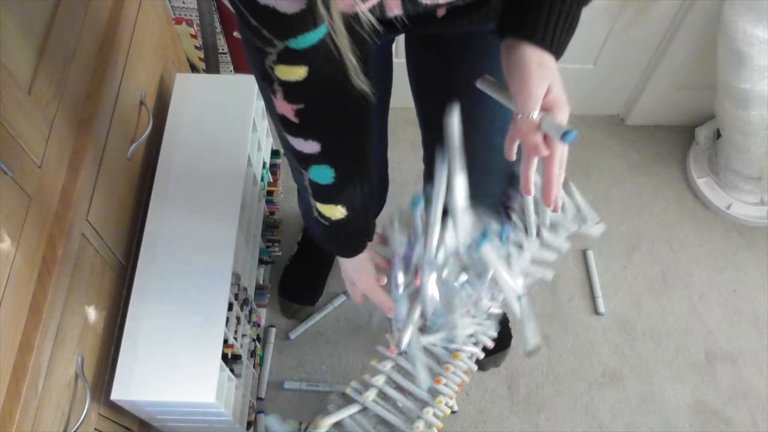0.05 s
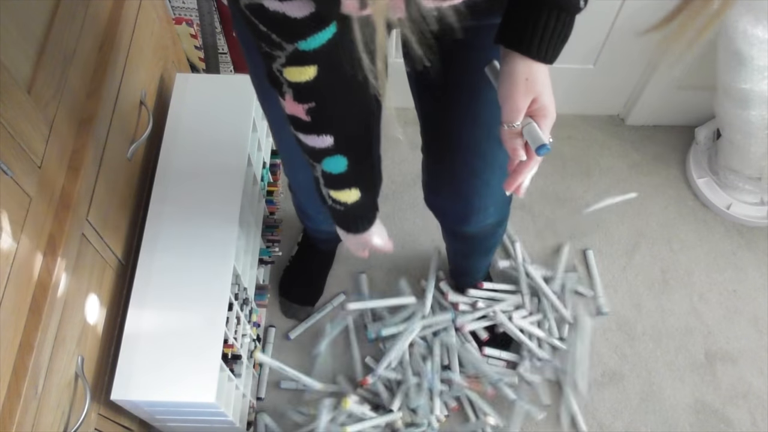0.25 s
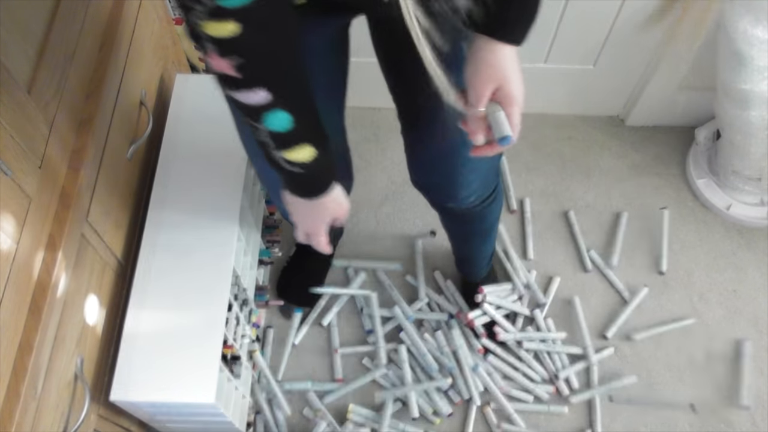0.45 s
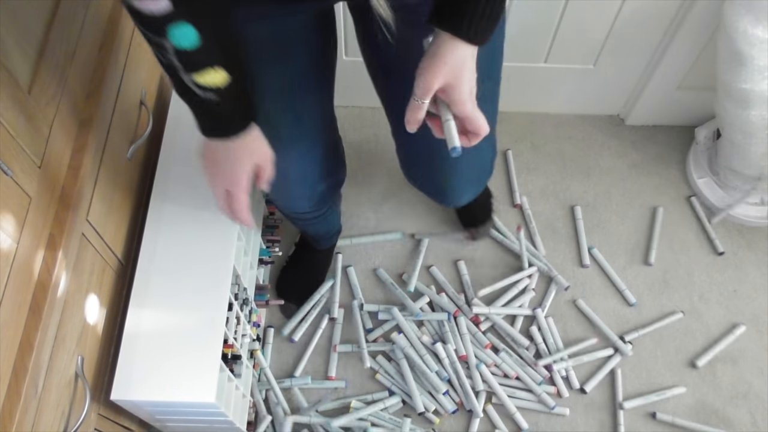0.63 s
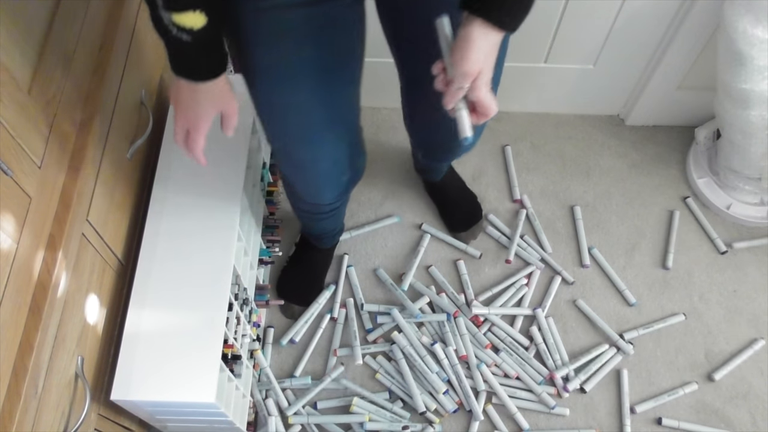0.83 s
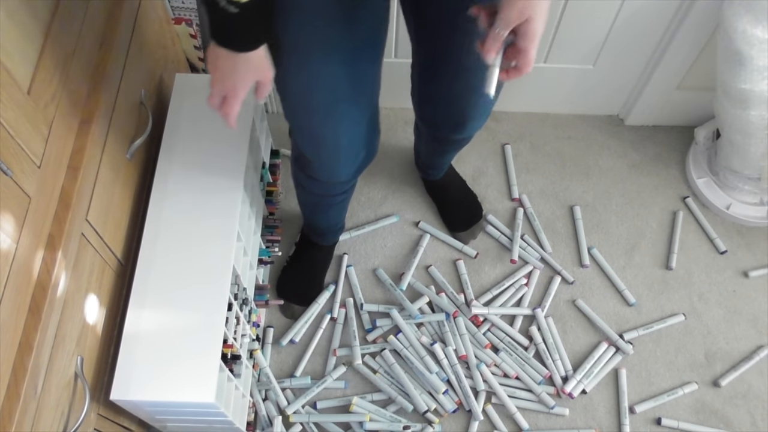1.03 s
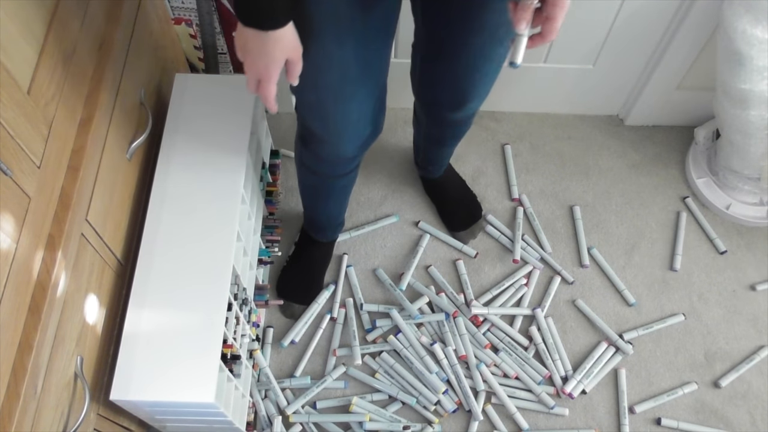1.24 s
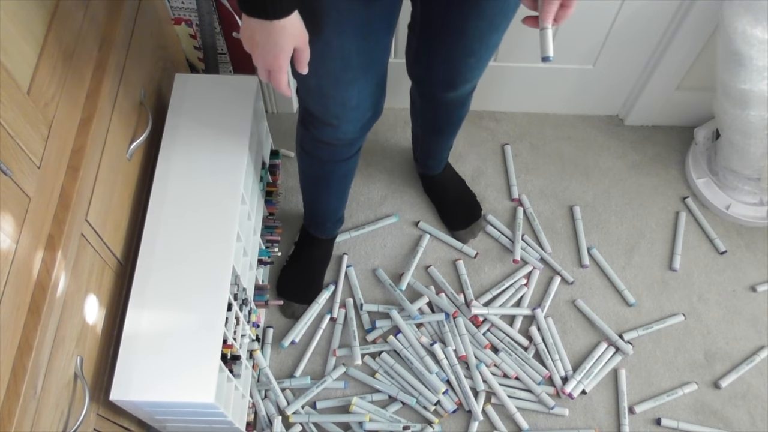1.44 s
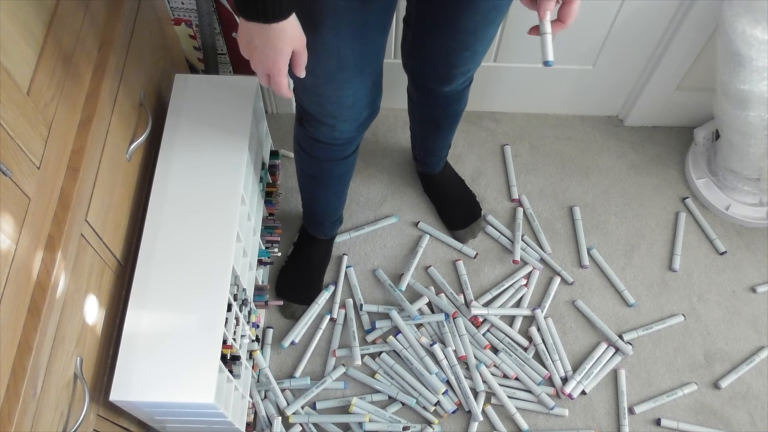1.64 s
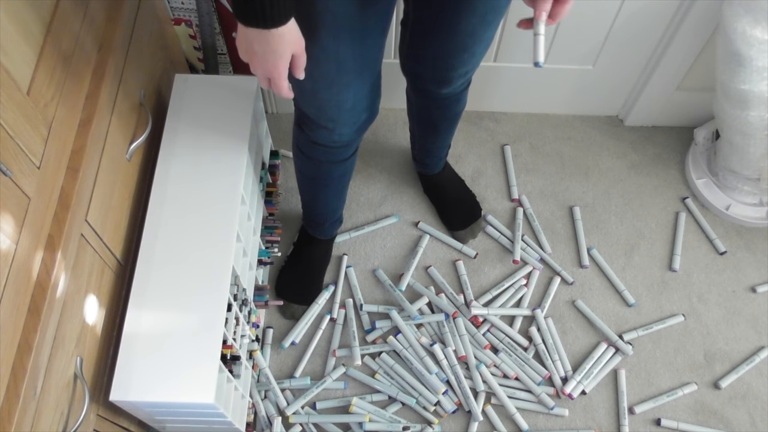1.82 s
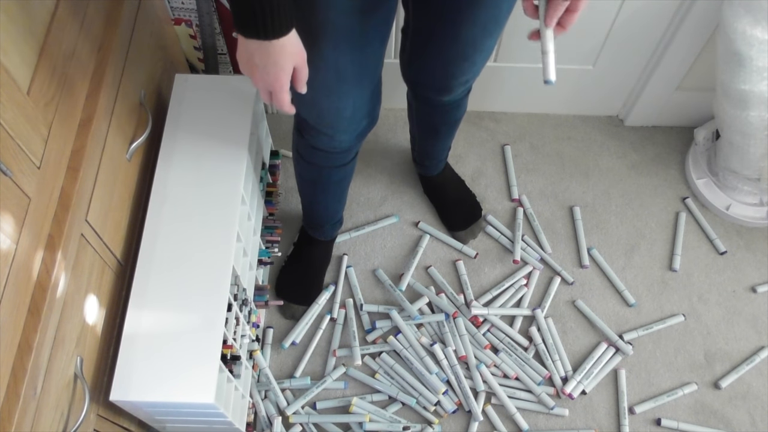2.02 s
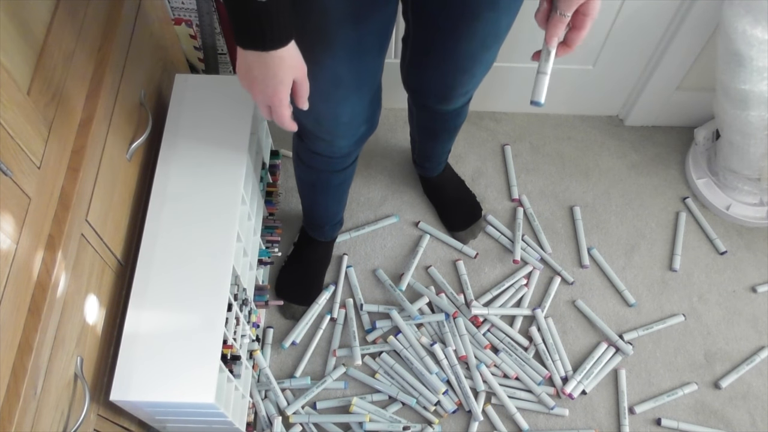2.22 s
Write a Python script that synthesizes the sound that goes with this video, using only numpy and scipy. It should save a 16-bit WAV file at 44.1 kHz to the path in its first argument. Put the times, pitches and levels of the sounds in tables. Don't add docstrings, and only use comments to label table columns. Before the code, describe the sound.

A big stack of plastic marker pens collapses onto carpet, a loud rattling clatter thinning to clicks

```python
import sys
import numpy as np
from scipy import signal
from scipy.fft import rfft, irfft
from scipy.io import wavfile

SR = 44100
rng = np.random.default_rng(int(sys.argv[2]) if len(sys.argv) > 2 else 0)


def pcm_store(signal):
    levels = np.round(np.clip(np.atleast_2d(signal), -1, 1) * 32767)
    wavfile.write(sys.argv[1], SR, levels.astype(np.int16).T)


def convert_level_to_amplitude(level_db):
    exponent = np.asarray(level_db, float) / 20
    return 10 ** exponent


N = 100107

# frequency_hz, density_db
HUSH_TONE = [(30, -8.5), (200, -4), (800, -11), (2100, -24), (3000, -29.5), (5200, -31), (8500, -22.5),
             (16000, -26)]
HUSH_DB = -56.5
# frequency_hz, correlation [-1 to 1]
HUSH_SAME = [(60, -0.073), (290, -0.56), (640, 0.068), (1400, 0.56), (2400, 1), (7400, 0.98), (9000, 0.6),
             (15000, -0.3)]
# frequency_hz, difference_db
HUSH_LEAN = [(60, -1.6), (950, 0.19), (15000, 0)]

# start_s, level_db, thump_relative_db, collisions_per_ms
FALL = [
    [(0.085, -25.5, -5, 2.6), (0.093, -23.5, -3.5, 1.3), (0.125, -10.5, -14, 1.27), (0.143, -22, -5, 1.25),
     (0.161, -12.5, -5.5, 1.2), (0.255, -15.5, -6.5, 1.62), (0.329, -20.5, -0.5, 1.23),
     (0.36, -21.5, -5.5, 1.134)],
    [(0.39, -23, 0, 1.3), (0.526, -20.5, -2, 1.33), (0.57, -17.5, -3.5, 1.3), (0.822, -34.5, 6, 1.32),
     (0.834, -19.5, -16, 0.85), (0.856, -39, 11.5, 1.4), (0.9, -34.5, 2, 1.3), (0.95, -47.5, 13, 1.12)],
]
# start_s, level_db, thump_relative_db, collisions_per_ms
SETTLE = [
    (1.0, -45, 7.5, 0.71),
    (1.1, -55, 19.5, 0.6),
    (1.19, -61.5, 19, 0.6),
    (1.25, -57, 15, 0.3),
    (1.35, -66, 13.5, .5),
    (1.449, -72.5, 14.5, 0.47),
]
# start_s, tick_peak_db, thump_relative_db, tick_pitch_hz, thump_pitch_hz
HITS = [(0.0916, -12, 0, 7670, 464), (0.121, -13, -4, 7450, 478), (0.1593, -3.5, -1.5, 7810, 493),
        (0.1978, 0.5, -9, 8070, 339), (0.2113, -13, -4.5, 8100, 253), (0.2477, -12, -4.5, 7510, 505),
        (0.3344, -10.5, -18.5, 7603, 433.7), (0.3553, -4.5, -14, 7190, 344), (0.3755, -12.5, 1, 7810, 464),
        (0.4453, -10, -10.5, 7900, 506), (0.5344, -17, -8.5, 8620, 530), (0.5513, -20, -2, 7950, 335),
        (0.592, -8.5, -7.5, 2248, 445), (0.7163, -5, 2, 3300, 1240), (0.7265, -13.5, 6.5, 2218, 1045),
        (0.7494, -10.5, -31.5, 6815, 487), (0.7869, -22, -19, 2120, 294), (0.7953, -19, -12, 7150, 258),
        (0.8017, -15, -20, 6940, 336), (0.8301, -14.5, -9.5, 7360, 261), (0.8405, -16.5, 12.5, 3833, 1150),
        (0.8695, -21.5, -10, 8100, 479), (0.8946, -9.5, -19, 6810, 430), (0.9341, -21.5, 0.5, 8320, 460)]
# start_s, tick_peak_db, thump_relative_db, tick_pitch_hz, thump_pitch_hz
LAST_HITS = [(0.9983, -18.5, 0.5, 12600, 470), (1.0021, -21, 1.5, 7500, 478.7),
             (1.052, -26.5, -13.5, 2600, 358), (1.0584, -30, 0.5, 1755, 350),
             (1.073, -34.5, 7.5, 1650, 353), (1.0814, -29.5, -33, 2290, 452),
             (1.097, -20.5, -36.5, 6900, 344), (1.1248, -29, -4.5, 8580, 326), (1.1372, -23, -2, 2977, 497),
             (1.1532, -29.5, -11, 2680, 489), (1.2055, -36.5, -16.5, 6800, 378),
             (1.2146, -22.5, -16, 8410, 336), (1.2165, -25.5, -3.5, 2027, 600),
             (1.2175, -29, -17, 3300, 397), (1.2241, -36, 2.5, 7900, 328), (1.2394, -35.5, -22, 3440, 363),
             (1.291, -45, 2, 5000, 895), (1.293, -12.5, -17, 4100, 512), (1.8155, -42.5, -10.5, 7670, 507)]
# start_s, peak_db, pitch_hz
TICKS = [(0.1096, -5.5, 6974), (0.126, -8.5, 7110), (0.1309, -5, 8050), (0.1456, -9.5, 7190),
         (0.1526, -7, 7750), (0.1723, -3.5, 6930), (0.1791, -2.5, 7110), (0.2018, -2.5, 7760),
         (0.2117, -3.5, 8816), (0.2212, 0.5, 7530), (0.2293, -7, 7890), (0.2505, -1, 7750),
         (0.2798, -8.5, 6520), (0.2917, -9, 7060), (0.2976, -14.5, 8330), (0.3053, -9.5, 7280),
         (0.3126, -10.5, 7490), (0.3424, -3.5, 7580), (0.3607, -12.5, 6800), (0.3769, -11.5, 8910),
         (0.3875, -19, 7320), (0.414, -16, 2020), (0.4162, -9, 6840), (0.4573, -17, 7540),
         (0.4717, -14.5, 8720), (0.494, -12, 7007), (0.509, -10.5, 1823), (0.5216, -14, 7632),
         (0.5366, -9.5, 8120), (0.5473, -12, 7320), (0.553, -4.5, 7840), (0.5618, -10, 8700),
         (0.5717, -4.5, 9000), (0.5824, -11.5, 8670), (0.6112, -8, 6760), (0.6252, -10.5, 7630),
         (0.6335, -7, 7330), (0.6476, -9.5, 2180), (0.6623, -8.5, 8400), (0.675, -16.5, 6690),
         (0.6913, -17.5, 7810), (0.6983, -19, 7930), (0.7043, -17.5, 8280), (0.7085, -18.5, 3060),
         (0.723, -9.5, 6980), (0.7275, -17, 7694), (0.7544, -17, 7540), (0.8154, -25, 7170),
         (0.8203, -19, 7750), (0.8365, -11.5, 7450), (0.8395, -10, 3483), (0.844, -16, 3620),
         (0.8797, -19, 3537), (0.89, -21, 6510), (0.9131, -24, 6750), (0.9252, -22.5, 8720),
         (0.9308, -29, 7287), (0.9707, -32.5, 8310)]
# start_s, peak_db, pitch_hz
THUMPS = [(.096, -8.5, 470), (.132, -15.5, 447), (.165, -10, 378.9), (.222, -11, 157.5), (.312, -14, 347),
          (.338, -9, 434), (.495, -9, 1370), (.47, -22.5, 125), (.58, -10, 438), (.592, -19.5, 2230),
          (.785, -27, 115), (.71, -8.5, 1105), (0.722, -14, 950), (0.804, -16, 298), (.844, -16, 752),
          (.847, -19.5, 1320), (0.935, -25.5, 474), (1.493, -40, 692), (1.4985, -42, 582),
          (1.5061, -41, 588.5), (1.518, -48, 695), (1.798, -54, 199), (2.263, -57.5, 394)]
SHOWER_DB, FINE_TICKS_DB, LOUD_TICKS_DB, HIT_DB, HIT_THUMP_DB = -2.5, -2, 1, 2, -3
TICK_SPREAD_DB, THUMP_SPREAD_DB, THUMPS_PER_TICK = 3, 3.5, 0.74

# frequency_hz, density_db
TICK_TONE = [(700, -38), (1900, -15.5), (3900, -4.5), (5200, -10.5), (7800, -3), (10000, -7), (12500, -14),
             (16000, -26)]
# frequency_hz, density_db
THUMP_TONE = [(60, -33.5), (110, -15.5), (200, -11), (370, -5), (520, -2.5), (800, -9), (1300, -15.5),
              (2600, -28)]
RISE_S, SNAP_T60_S = 0.00022, 0.0015
TICK_T60_S, TICK_RING_CYCLES, TICK_RING_DB = 0.0044, 14, -4
THUMP_T60_S, THUMP_RING_CYCLES, THUMP_RING_DB = 0.073, 20, 1
REBOUND_S, REBOUND_DB = 0.0011, -1.5

# delay_s, level_db
ECHOES = [
    (.0028, -9.5),
    (.0063, -14),
    (0.0109, -18.5),
    (0.02, -17.5),
    (0.025, -26),
]
# frequency_hz, t60_s
ROOM_T60 = [(100, 0.46), (500, 0.31), (2500, 0.35), (4500, 0.22), (7500, 0.28), (11000, 0.12),
            (15000, 0.061)]
WALL_HZ, ROOM_DB, THUMP_ROOM_DB = 9000, -10, -7
PATH_HOLD_S, SMEAR_HOLD_S = 0.035, 0.018

# frequency_hz, correlation [-1 to 1]
PENS_SAME = [(60, .88), (300, .92), (700, .86), (1700, .8), (2600, 1), (8200, .993), (9100, .9),
             (11000, 0.13)]
# frequency_hz, difference_db
PENS_LEAN = [(60, -10), (130, -11.5), (290, -6.5), (640, -3), (1400, .4), (2400, 0.23), (15000, -0.05)]
# frequency_hz, phase_rad
PENS_LEAD = [(60, .3), (700, 0.85), (2400, 0.02)]
NOTCH_HZ, NOTCH_Q, NOTCH_SHARE = 5087, 7, 0.4
BASS_CUT_HZ, EDGE_HZ = 70, 15800
START_S, FADE_IN_S = 0.079, 0.0135
DIP_S, DIP_FALL_S, DIP_RISE_S, DIP_DB = 2.168, 0.014, 0.014, -22.5


def evened(x):
    return x / np.sqrt(np.mean(x ** 2) + 1e-20)


def read(points, hz):
    f, value = np.transpose(points)
    return np.interp(np.log(hz + 1), np.log(f + 1), value)


def add(mix, s, sound):
    part = mix[round(s * SR):][:len(sound)]
    part += sound[:len(part)]


def colour(x, tone):
    log_gain = np.log(convert_level_to_amplitude(read(tone, abs(np.fft.fftfreq(8192, 1 / SR)))))
    taps = np.fft.ifft(np.exp(np.conj(signal.hilbert(log_gain)))).real[:3000]
    return signal.fftconvolve(x, taps[:len(x)])[:len(x)]


def room_hush():
    return [convert_level_to_amplitude(HUSH_DB) * evened(colour(noise, HUSH_TONE)) for noise in rng.standard_normal((2, N))]


def body(low_hz, high_hz, t60, tone, count, snap_db, main_hz, main_db, main_t60):
    t = np.arange(0, min(2 * max(t60, main_t60) + 0.004, 0.09), 1 / SR)
    place, strength, damping = rng.random((count, 3)).T
    mode_hz = low_hz * (high_hz / low_hz) ** ((np.arange(count) + place) / count)
    modes = np.zeros(len(t))
    for hz, a, d in zip(mode_hz, strength, damping):
        modes += a * np.sin(2 * np.pi * hz * t) * convert_level_to_amplitude(-60 * t / (t60 * (0.5 + d)))
    impact = rng.standard_normal(len(t)) + 9 * (t == t[8])
    snap = convert_level_to_amplitude(snap_db - 60 * t / SNAP_T60_S) * impact
    x = colour(modes + snap, tone)
    x = x / abs(x).max()
    if main_hz:
        x = x + convert_level_to_amplitude(main_db - 60 * t / main_t60) * np.sin(2 * np.pi * main_hz * t)
    x = x * np.minimum((t + 1 / SR) / RISE_S, 1)
    return x / abs(x).max()


def tick(main_hz=None):
    x = body(1800, 15000, TICK_T60_S, TICK_TONE, count=12, snap_db=12.5, main_hz=main_hz,
             main_db=TICK_RING_DB, main_t60=TICK_RING_CYCLES / (main_hz or SR))
    lag = round(REBOUND_S * SR * rng.uniform(0.7, 1.6))
    return x + convert_level_to_amplitude(REBOUND_DB) * np.roll(x, lag) * (np.arange(len(x)) >= lag)


def thump(main_hz=None):
    t60 = min(THUMP_T60_S, THUMP_RING_CYCLES / main_hz) if main_hz else THUMP_T60_S
    return body(110.5, 2201, t60, THUMP_TONE, count=10, snap_db=24, main_hz=main_hz,
                main_db=THUMP_RING_DB, main_t60=t60)


def shower(sound, per_ms, level_db, spread_db, count=40):
    chance = np.clip(per_ms, 0.03, 9) * 1000 / SR
    size = convert_level_to_amplitude(spread_db * np.minimum(rng.exponential(1, N), 4)) * (rng.random(N) < chance)
    which = rng.integers(0, count, N)
    blows = size * rng.choice([-1., 1.], N) / np.sqrt(chance)
    x = sum(signal.oaconvolve(blows * (which == k), evened(sound()))[:N] for k in range(count))
    return evened(x) * convert_level_to_amplitude(level_db), evened(blows) * convert_level_to_amplitude(level_db)


def echoes():
    x = np.zeros(2000)
    for s, db in ECHOES:
        add(x, s * rng.uniform(0.85, 1.15), convert_level_to_amplitude([db]))
    return signal.lfilter(*signal.butter(2, WALL_HZ, fs=SR), x)


def room():
    taps = np.zeros(SR // 2)
    at = np.arange(200, len(taps) - 20, 20)
    taps[at + rng.integers(0, 20, len(at))] = rng.choice([-1., 1.], len(at))
    hz, t, z = signal.stft(taps, SR, nperseg=256)
    decay = convert_level_to_amplitude(-60 * t / read(ROOM_T60, hz)[:, None])
    tail = signal.istft(z * decay, SR, nperseg=256)[1]
    return tail / np.linalg.norm(tail)


def shifting(x, response, count, hold_s):
    turn = np.arange(N) / (hold_s * SR)
    out = np.zeros(N)
    for k in range(count):
        away = abs((turn - k + count / 2) % count - count / 2)
        share = np.cos(np.pi / 2 * np.minimum(away, 1))
        out += signal.oaconvolve(x * share, response())[:N]
    return out


def pens():
    s, level_db, thump_db, per_ms = np.transpose(list(FALL[0]) + list(FALL[1]) + list(SETTLE))
    t = np.arange(N) / SR
    level_db, thump_db, per_ms = (np.interp(t, s, v) for v in (level_db, thump_db, per_ms))
    level_db = level_db + SHOWER_DB - 100 * np.maximum(t - s[-1], 0)
    high, blows = shower(tick, per_ms, level_db + FINE_TICKS_DB, TICK_SPREAD_DB)
    low = shower(thump, THUMPS_PER_TICK * per_ms, level_db + thump_db, THUMP_SPREAD_DB)[0]

    def add_tick(at, db, hz):
        sound = convert_level_to_amplitude(db) * tick(hz)
        add(high, at, sound)
        add(blows, at, np.linalg.norm(sound, keepdims=True))

    for at, db, rel_db, hz, low_hz in list(HITS) + list(LAST_HITS):
        add_tick(at, db + HIT_DB, hz)
        add(low, at, convert_level_to_amplitude(db + rel_db + HIT_THUMP_DB) * thump(low_hz))
    for at, db, hz in TICKS:
        add_tick(at, db + LOUD_TICKS_DB, hz)
    for at, db, hz in THUMPS:
        add(low, at, convert_level_to_amplitude(db) * thump(hz))

    far_ticks = evened(colour(blows, TICK_TONE)) * np.std(high) * convert_level_to_amplitude(ROOM_DB)
    far = far_ticks + low * convert_level_to_amplitude(THUMP_ROOM_DB)
    direct = high + low
    near = direct + shifting(direct, echoes, count=7, hold_s=PATH_HOLD_S)
    heard = near + shifting(far, room, count=4, hold_s=PATH_HOLD_S)
    return signal.sosfilt(signal.butter(4, BASS_CUT_HZ, "high", fs=SR, output="sos"), heard)


def smear():
    x = rng.standard_normal(400) * convert_level_to_amplitude(-8000 * np.arange(400) / SR)
    return x / np.linalg.norm(x)


def ports(a, b, same, lean, lead):
    hz = np.fft.rfftfreq(N, 1 / SR)
    angle = np.arccos(np.clip(read(same, hz), -1, 1)) / 2
    tilt = convert_level_to_amplitude(read(lean, hz) / 2)
    a = rfft(a) * np.cos(angle)
    b = rfft(b) * np.sin(angle)
    first = tilt * (a + b) * np.exp(1j * read(lead, hz))
    second = (a - b) / tilt
    return irfft(np.array([first, second]), N)


def scene():
    hush = ports(*room_hush(), HUSH_SAME, HUSH_LEAN, [(60, 0.0029), (9000, 0.0058)])
    a = pens()
    scattered = shifting(a, smear, count=9, hold_s=SMEAR_HOLD_S)
    return hush + ports(a, scattered, PENS_SAME, PENS_LEAN, PENS_LEAD)


def top_cut(x):
    return signal.sosfilt(signal.butter(12, 16470, fs=SR, output="sos"), x)


def record(dry):
    t = np.arange(N) / SR
    fade = np.clip((t - START_S) / FADE_IN_S, 0, 1) ** 2
    dip = convert_level_to_amplitude(DIP_DB * np.interp(t, [DIP_S - DIP_FALL_S, DIP_S, DIP_S + DIP_RISE_S], [0, 1, 0]))
    heard = dry - NOTCH_SHARE * signal.lfilter(*signal.iirpeak(NOTCH_HZ, NOTCH_Q, SR), dry)
    clipped = np.clip(heard * fade * dip, -1, 1)
    band_limit = signal.firwin(255, EDGE_HZ, window=("kaiser", 9), fs=SR)
    mix = signal.oaconvolve(clipped, band_limit[None], "same")
    return top_cut(mix)


dry = scene()
out = record(dry)
pcm_store(out)
```